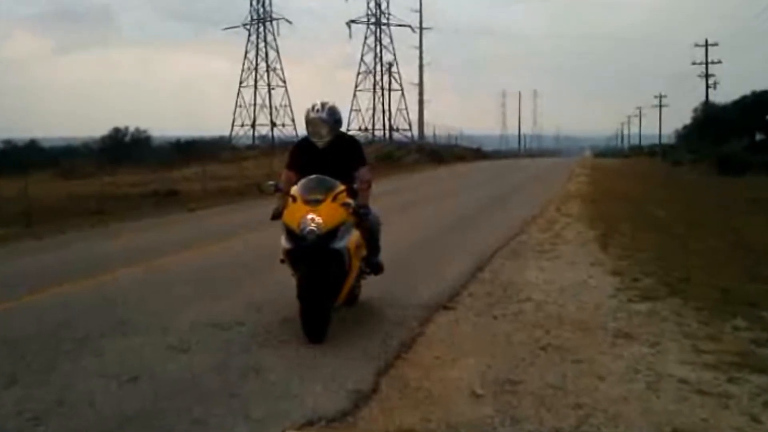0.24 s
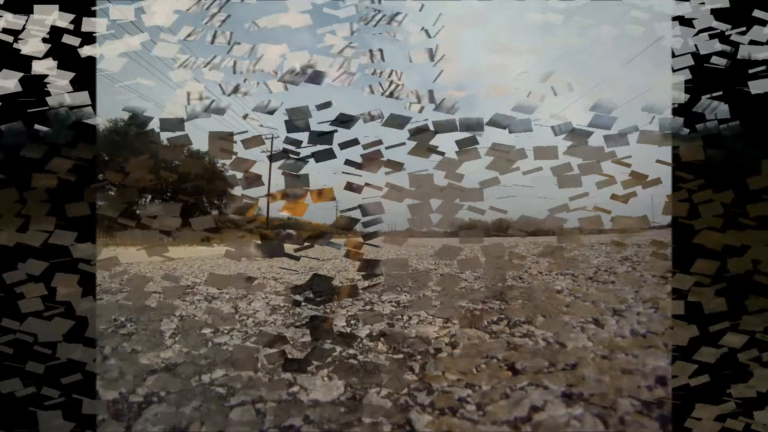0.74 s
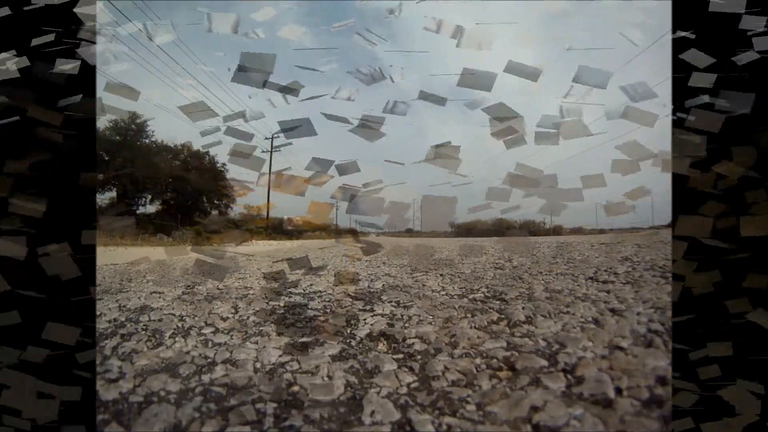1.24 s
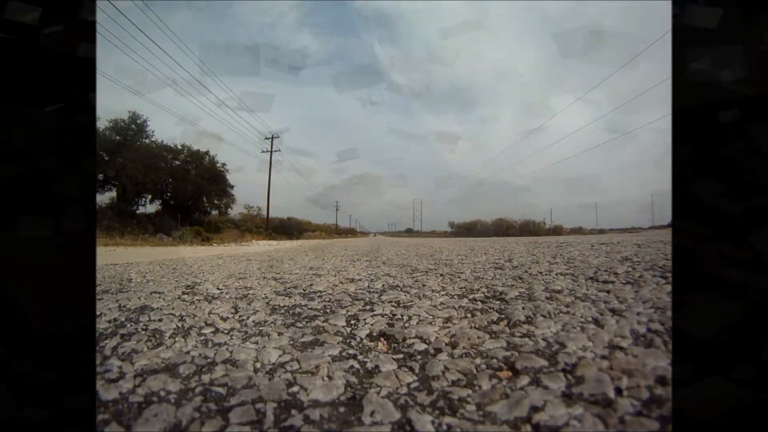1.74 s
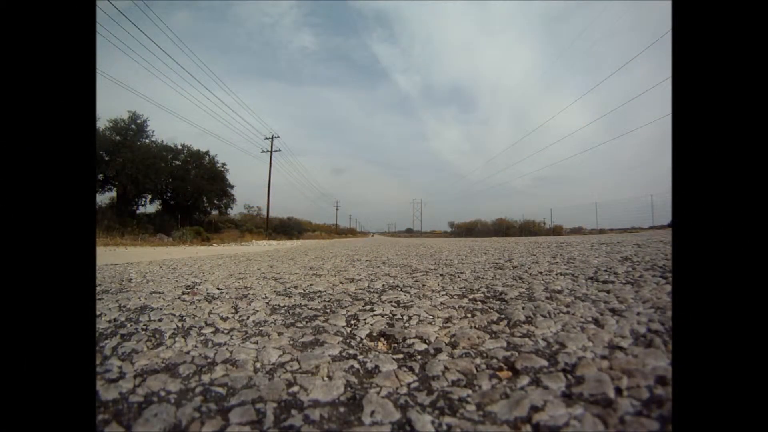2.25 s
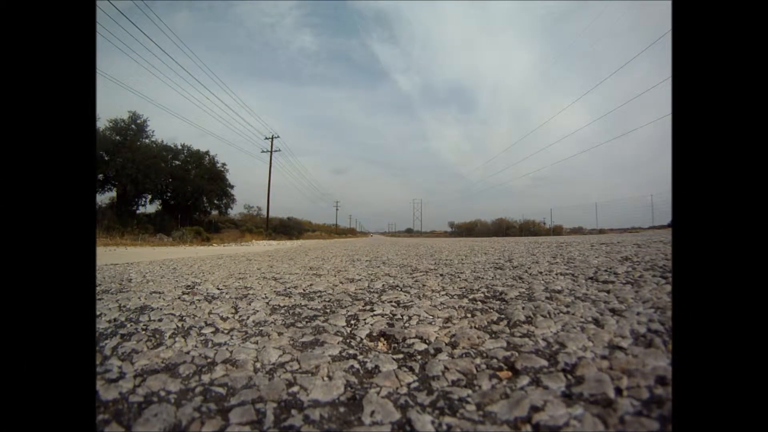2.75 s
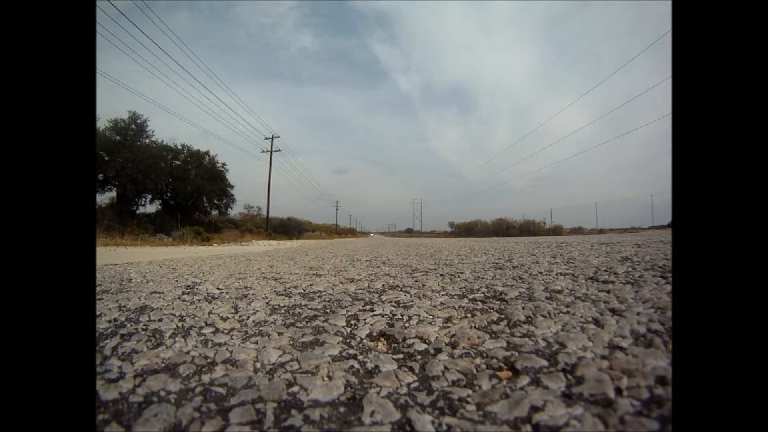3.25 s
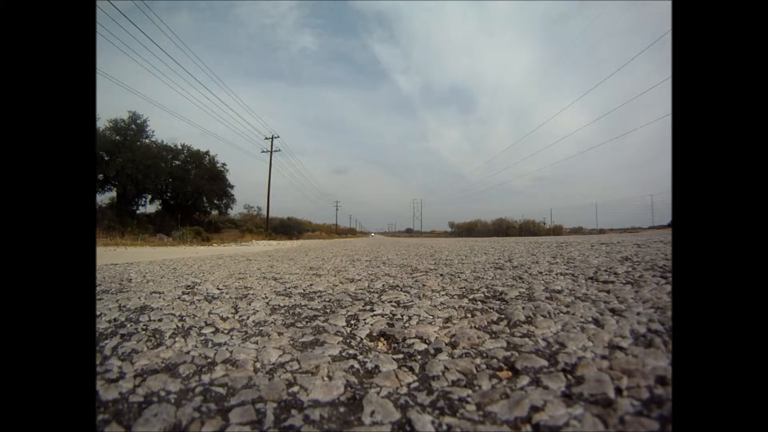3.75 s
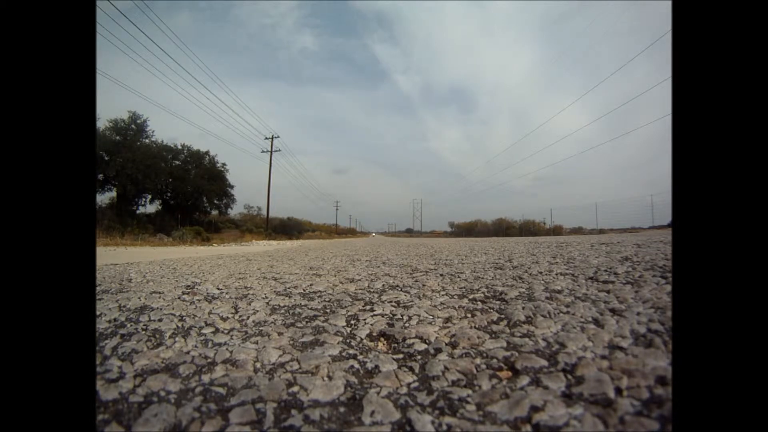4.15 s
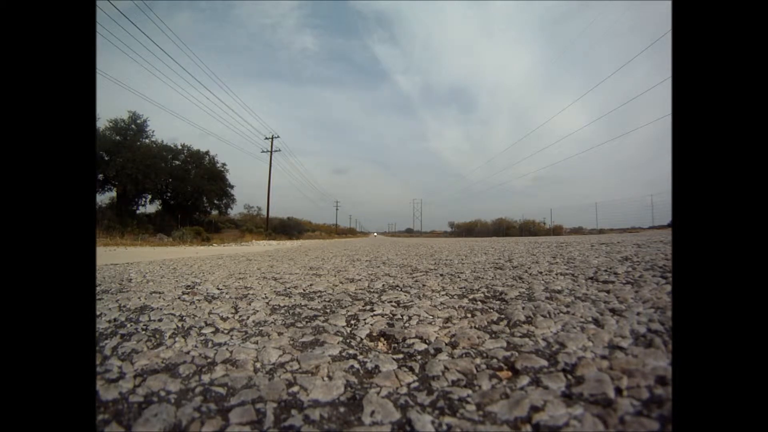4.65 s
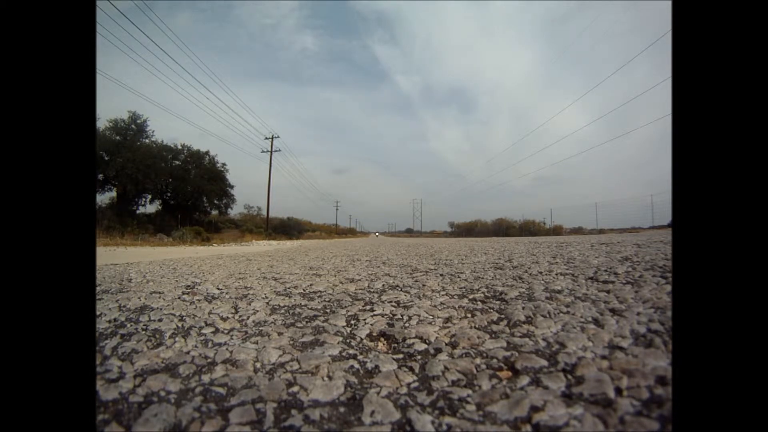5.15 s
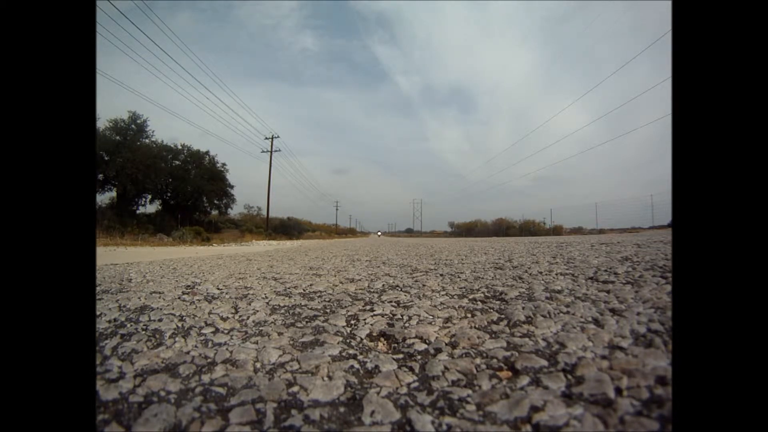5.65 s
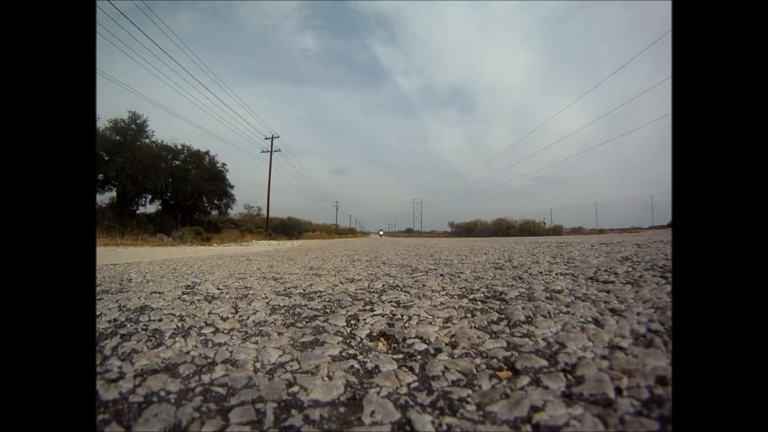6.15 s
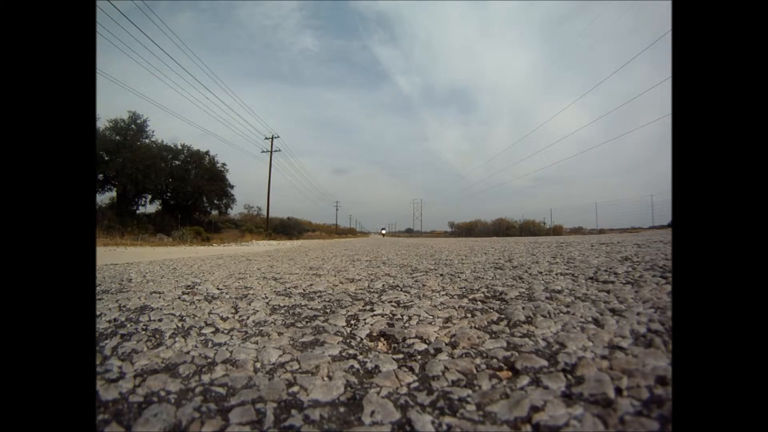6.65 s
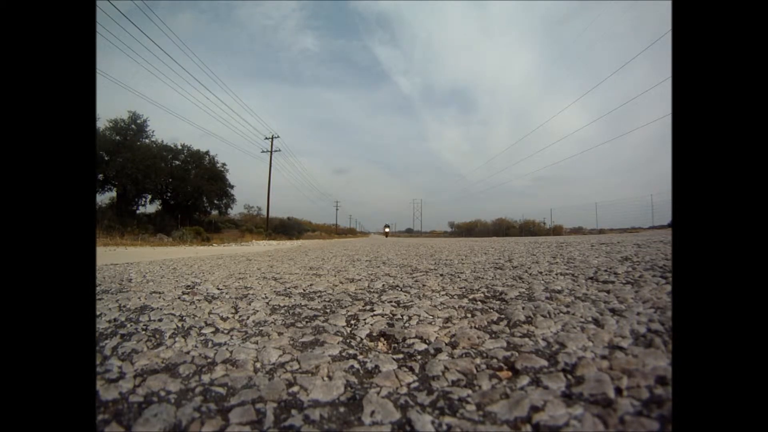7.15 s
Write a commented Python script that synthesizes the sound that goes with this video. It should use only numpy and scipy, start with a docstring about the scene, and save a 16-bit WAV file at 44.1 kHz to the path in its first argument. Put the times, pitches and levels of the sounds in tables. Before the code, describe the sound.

Muffled four-cylinder motorcycle engine climbs from faint lumpy idle to a hard, rasping held roar, faint whine above, then slackens and flicks up once.

```python
"""On a moving four-cylinder sports motorcycle, heard from inside the sealed case of a small camera.
The engine idles, pulls away, revs up to a steady high note, then drops back with brief dips and one last blip.
Waves at multiples of the firing rate make the deep note; more waves and shaped noise make throb, bark and rasp.
The case sizzles, its mount ticks, and noise makes the buffeting air, short low thumps and the steady hiss.
Holding each 12 kHz sample adds a faint high whine, a mirror image of the engine."""
import sys
import numpy as np
from scipy import signal
from scipy.fft import rfft, irfft, next_fast_len
from scipy.io import wavfile
from scipy.ndimage import uniform_filter1d

SR = 44100
rng = np.random.default_rng(int(sys.argv[2]) if len(sys.argv) > 2 else 0)


def unload_wav(signal):
    """Save mono or channel-first audio to the path in sys.argv[1] as 16-bit WAV at rate SR, clipped to [-1, 1]."""
    wavfile.write(
        sys.argv[1],
        SR,
        np.round(np.clip(np.atleast_2d(signal).T, -1, 1) * 32767).astype(np.int16),
    )


N = 326781
TIME = np.arange(N) / SR  # [s]


def undb(db):
    """Turn decibels into a gain."""
    return 10 ** (np.asarray(db) / 20)


def curves(table):
    """Join each column of a table by straight lines in time."""
    s, *columns = np.transpose(table)
    return [np.interp(TIME, s, column) for column in columns]


def unit(x):
    """Scale to an rms (average strength) of 1."""
    return x / np.sqrt(np.mean(x ** 2))


def colour(x, points):
    """Filter by an outline of (frequency [Hz], relative level [dB]); white noise keeps its power."""
    size = next_fast_len(N + 4096)
    hz, db = np.transpose(points)
    octave = np.log2(np.maximum(np.arange(size // 2 + 1) * SR / size, 1))
    below = np.maximum(np.log2(hz[0]) - octave, 0)
    above = np.maximum(octave - np.log2(hz[-1]), 0)
    # beyond both ends the outline falls by a further 30 dB per octave
    gain = undb(np.interp(octave, np.log2(hz), db) - 30 * (below + above))
    return irfft(rfft(x, size) * unit(gain), size)[:N]


def noise(points):
    """Coloured noise with an rms near 1."""
    return colour(rng.standard_normal(N), points)


def walk(rate):
    """Wander at random, sliding to a new level `rate` times a second; the rms is 1."""
    k = max(int(SR / rate), 1)
    steps = np.repeat(rng.standard_normal(N // k + 1), k)[:N]
    return unit(uniform_filter1d(steps, k))


def bump(s, half):
    """A smooth swell around time s."""
    return np.exp(-((TIME - s) / half) ** 2)


def idling(hz):
    """1 at idle, fading quickly as the revs rise."""
    idle_hz = 37.03
    return np.minimum(idle_hz / hz, 1) ** 4


def firing_rate():
    """Firings per second: the rider's speed curve and last blip, brief wobbles, hunting at idle."""
    # engine speed before the changes below: (time [s], firing rate [Hz])
    speed = [(0.4, 34.37), (0.75, 32.52), (0.9, 36.56), (1.83, 37.23), (1.98, 58.3), (2.2, 54.6),
             (2.33, 46.88), (2.624, 54.8), (3.429, 94.5), (3.69, 111.3), (4.018, 136.3), (4.69, 186),
             (4.984, 201.9), (5.7, 211.9), (6.22, 215), (6.895, 211.8), (6.96, 197), (7.112, 203.2),
             (7.295, 199.5)]
    # the pitch wobbles briefly: (time of a crest [s], half length [s], share of speed [0-1])
    wobbles = [(2.78, .13, .033), (3.96, .1, .014), (4.82, .16, .019)]
    wobble_hz = 9.8
    blip_s, blip_hz, rise_s, fall_s = 7.297, 52.8, .04, .1  # a last flick of the throttle
    hz, = curves(speed)
    hz = hz + np.interp(TIME, blip_s + np.cumsum([0, rise_s, fall_s]), [0, blip_hz, 0])
    wobble = 0
    for s, half, share in wobbles:
        wobble = wobble + share * bump(s, half) * np.cos(2 * np.pi * wobble_hz * (TIME - s))
    hunting = .025 * idling(hz) * walk(14)  # near idle the speed hunts at random
    return hz * (1 + wobble + hunting)


def engine(hz):
    """Firings drive the deep note, a throb and bark of gas in the pipe, and a rasp in the camera case."""
    # the rough part, before mixing: (time [s], exhaust gas level [dB], valve gear and wind level [dB])
    rough = [(0.4, -68, -90), (1.75, -65, -90), (2.06, -60, -75), (2.55, -56, -75.5), (3.05, -49, -76),
             (3.85, -38, -65.5), (4.5, -39, -63.5), (4.8, -41.5, -59.5), (5.1, -38, -59.5), (6.1, -36, -55),
             (6.45, -34.5, -48.5), (6.89, -32.5, -46.5), (6.94, -39.5, -52.5), (7.28, -38, -52),
             (7.33, -31.5, -44.5), (7.405, -35, -47)]
    # moments when the note dips briefly and a thump is heard:
    # (time [s], half length [s], share of the note lost [0-1], thump level [dB])
    dips = [(6.903, .005, 0, -16), (6.914, .005, .5, -26), (7.028, .012, .2, -24.5),
            (7.303, .005, .75, -23), (7.348, .004, .25, -27)]
    # colour of the throb: (frequency [Hz], relative level [dB])
    boom_colour = [(40, -24.5), (90, -15), (135, -7.5), (170, 2.5), (210, -4), (255, -13.5), (330, -31),
                   (500, -43.5)]
    # colour of the bark: (frequency [Hz], relative level [dB])
    bark_colour = [(250, -6), (330, 0), (420, -7.5), (530, 1), (600, -3.5), (680, -7.5), (740, -15),
                   (850, -20), (950, -23.5), (1060, -22.5), (1250, -32.5), (1500, -42.5)]
    # colour of the rasp in the case: (frequency [Hz], relative level [dB])
    case_colour = [(600, -6.5), (1000, -1.5), (1450, -3.5), (1750, -3.5), (2200, -1.5), (2650, -8),
                   (2970, 1), (3130, -5), (3300, -1), (3550, -15.5), (4200, -19), (5500, -27)]
    gas_db, rasp_db = curves(rough)
    phase = 2 * np.pi * np.cumsum(hz * (1 + .002 * walk(22))) / SR  # the crank speed wanders slightly
    note = exhaust_note(hz, phase, pipe_hz=143.5, pipe_q=1.6)
    lines = buzz(hz, phase, quarter_db=-13, waver_db=3)

    # the pipe throbs even at idle and grows more slowly than the bark
    throb_db = -38 + 0.41 * (gas_db + 40.5) + 0.051 * (rasp_db + 59.5)
    throb = undb(throb_db) * (0.82 * colour(lines, boom_colour) + 1.1 * noise(boom_colour))

    puffs = unit(1 + .5 * np.cos(phase))  # gas leaves once per firing
    bark = undb(gas_db) * (0.74 * colour(lines, bark_colour) + 0.7 * puffs * noise(bark_colour))

    clatter = unit(1 + 0.19 * np.cos(phase / 4) + 0.1 * walk(90))  # valve gear repeats every four firings
    rasp = undb(rasp_db - 1.5) * (0.77 * colour(lines, case_colour) + clatter * noise(case_colour))

    # a short low thump at each listed moment; the note may dip with it
    thump = noise([(130, -4.5), (200, -6.5), (270, -6.5), (400, -20.5), (580, -11), (800, -55.5)])
    for s, half, lost, db in dips:
        swell = bump(s, half)
        note = note * (1 - lost * swell) + undb(db) * swell * thump
    return note + throb + bark + rasp


def exhaust_note(hz, phase, pipe_hz, pipe_q):
    """Low multiples (orders) of the firing rate, coloured and delayed by the pipe; slow firings thud apart."""
    # how hard the engine pulls: (time [s], level of the note [dB], brightness [dB per octave of order])
    effort = [(0.4, -36.5, 1.5), (1.85, -34, 2.5), (1.92, -31, -2), (2.06, -33.5, -2.7), (2.45, -29, -2.5),
              (2.72, -29, -1.5), (2.98, -21.5, .5), (3.58, -19, 2.5), (3.82, -21, 2.9), (4.12, -15, 5.7),
              (4.55, -15.5, 3.3), (4.78, -12.5, 5), (5.9, -12.5, 1), (6.4, -13.5, 0.8), (6.89, -13, 4),
              (6.94, -12.5, -2)]
    # resonances of pipe and case that every order sweeps through: (frequency [Hz], relative level [dB])
    resonances = [(35, -20), (65, -4), (100, -8), (142, 6), (200, 0), (250, -10.5), (320, -21), (390, -24),
                  (440, -21), (510, -21.5), (650, -26.5), (740, -33), (850, -42.5), (1050, -53.5),
                  (1400, -66)]
    # shape of each firing pulse, one entry per order from 1 up: (relative level [dB])
    pulse_db = [0, 0, 2, 0, -1.5, -6, -6]
    # where one order changes level: (order, firing rate [Hz], half width [Hz], change [dB])
    hollows = [(2, 196, 12, -10), (3, 73, 6, -4), (3, 122, 12, -4), (5, 112, 16, -6), (5, 170, 16, -14)]
    level_db, brightness = curves(effort)
    order = np.arange(1, len(pulse_db) + 1)[:, None]
    points_hz, points_db = np.transpose(resonances)
    pipe_db = np.interp(np.log(order * hz), np.log(points_hz), points_db)
    hollow_db = 0
    for hollow_order, at_hz, half_hz, db in hollows:
        nearness = np.exp(-((hz - at_hz) / half_hz) ** 2)
        hollow_db = hollow_db + db * (order == round(hollow_order)) * nearness
    waver = .8 * np.array([walk(5) for _ in order])  # upper orders waver: dB per octave of order
    tilt_db = (brightness + waver) * np.log2(order)
    gain = undb(np.c_[pulse_db] + tilt_db + pipe_db + hollow_db)
    share = gain / np.sqrt(np.sum(gain ** 2, axis=0))  # the orders share one overall level
    lag = 2 * np.arctan(pipe_q * (order * hz / pipe_hz - pipe_hz / (order * hz)))
    waves = np.sum(share * np.cos(order * phase - lag), axis=0)
    lumps_db = 1.2 * idling(hz) * walk(30)  # idle firings differ in strength
    note = np.sqrt(2) * undb(level_db + lumps_db) * waves
    return note * (1 + .03 * walk(110))  # small differences in strength at every speed


def buzz(hz, phase, quarter_db, waver_db):
    """Weaker orders; cylinders firing unequally put half and quarter orders between the whole ones."""
    # whole and half orders before wavering: (multiple of the firing rate, relative level [dB])
    weak_orders = [(1.5, -5.5), (2.5, -5.5), (3.5, -1), (4.5, -3), (5.5, -3), (6, 0), (6.5, -3.5), (7, 0.5),
                   (7.5, -4), (8, -7), (8.5, -3), (9, -12), (10, -10.5), (11, -11), (11.5, -5.5),
                   (13, -3.5), (14, -1), (15.5, -5.5)]
    lines = 0
    for order, db in weak_orders:
        lines = lines + undb(db + waver_db * walk(6.2)) * np.cos(np.round(2 * order) / 2 * phase)
    quarters = 0
    for k in range(1, 30):
        quarters = quarters + np.cos((k + .5) * phase / 2 + rng.uniform(0, 2 * np.pi))
    lines = lines + undb(quarter_db + waver_db * walk(11)) * quarters
    return lines * np.sqrt(4 * hz / SR)  # the same power per Hz at every speed


def case_rattle(hz, phase, panel_hz, width_hz, db):
    """The case sizzles briefly as the firing rate sweeps through one of its resonances."""
    shake = np.exp(-((hz - panel_hz) / width_hz) ** 2)
    puffs = 1 + 0.42 * np.cos(phase)  # shaken once per firing
    sizzle = noise([(1700, -15), (2050, -1), (2600, -19), (2950, 5.5), (3300, -12)])
    return undb(db) * shake * puffs * sizzle


def mount_ticks(hz, decay_s):
    """The shaken camera mount ticks at high revs; each tick dies within a few milliseconds."""
    # the loudest ticks, before they are turned to coloured noise: (time [s], strength [dB])
    loud_ticks = [(4.732, -52), (4.9642, -52), (5.0409, -52), (5.0942, -49.5), (5.2723, -50.5),
                  (5.4228, -51.5), (5.4908, -51), (5.51, -50), (6.9049, -45), (6.974, -52)]
    # fainter ticks come at random, 8 a second on average, while the firing rate is above 190 Hz
    loose = (rng.random(N) < 8 / SR) & (hz > 190)
    struck = loose * undb(-54 + 1.5 * rng.standard_normal(N))
    for s, strength_db in loud_ticks:
        struck[int(s * SR)] = undb(strength_db)
    tails = signal.lfilter([1], [1, -np.exp(-1 / (decay_s * SR))], struck)
    return colour(tails * rng.standard_normal(N), [(700, -1.5), (3000, -1), (5600, 2)])


def buffet(hz, db):
    """Air buffets the case in random gusts, a little harder at high revs."""
    gusts = undb(2.5 * walk(7))
    strength = (hz / hz.max()) ** 0.22
    return undb(db) * gusts * strength * noise([(20, -4), (45, -2.0), (90, 0.5), (140, -11)])


def steady_hiss(db):
    """Unchanging noise coloured by the hollow murmur of the case."""
    # colour of the hiss: (frequency [Hz], relative level [dB])
    hiss_colour = [(30, 13), (300, 6.5), (450, 10), (525, 10.5), (585, 7.5), (660, 13.5), (730, 3),
                   (1000, 2), (2000, -2), (4000, -4.5), (5500, -9)]
    return undb(db) * noise(hiss_colour)


def scene():
    """The engine, rattling case, ticking mount and wind over a steady hiss."""
    hz = firing_rate()
    motor = engine(hz)
    rattle_phase = 2 * np.pi * np.cumsum(hz) / SR
    rattle = case_rattle(hz, rattle_phase, panel_hz=173.2, width_hz=15, db=-61.0)
    ticks = mount_ticks(hz, decay_s=.001)
    return (motor + rattle + ticks + buffet(hz, db=-49) + steady_hiss(db=-61.0))[None]


def record(dry):
    """Start abruptly and hold each 12 kHz sample, which mirrors the engine as a whine around 12 kHz."""
    start_s, top_hz = .3826, 15300
    running = np.clip((TIME - start_s) / .0005, 0, 1)
    slow = signal.resample_poly(dry * running, 40, 147, axis=1)  # down to 12 kHz
    held = np.repeat(slow, 4, axis=1)  # each sample held for four steps at 48 kHz
    held = signal.resample_poly(held, 147, 160, axis=1)[:, :N]  # back to SR
    low_pass = signal.ellip(10, .2, 80, top_hz, fs=SR, output="sos")
    return signal.sosfilt(low_pass, held)


dry = scene()
out = record(dry)
unload_wav(out)
```